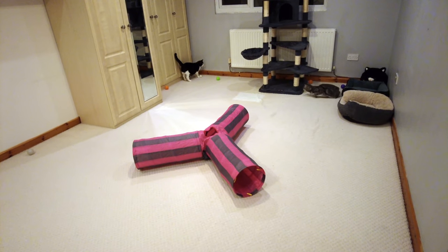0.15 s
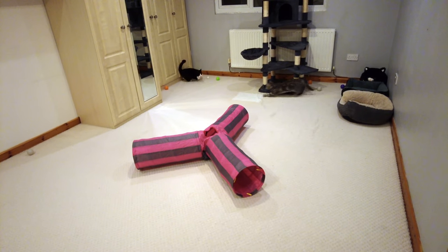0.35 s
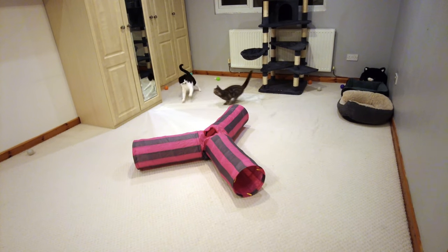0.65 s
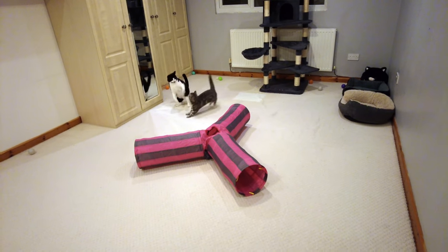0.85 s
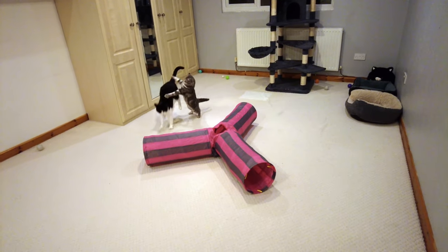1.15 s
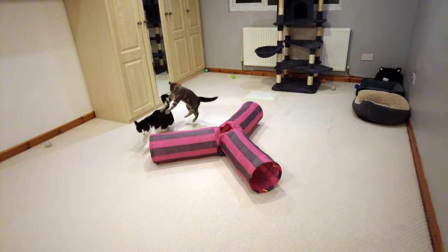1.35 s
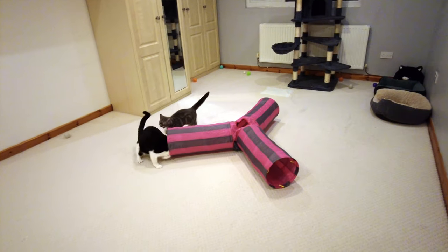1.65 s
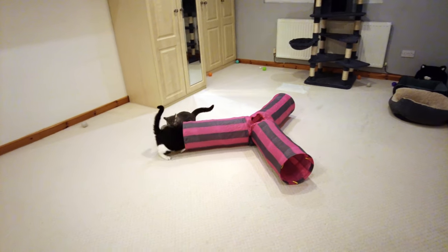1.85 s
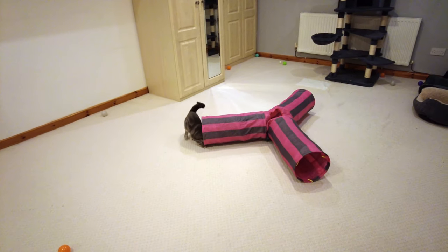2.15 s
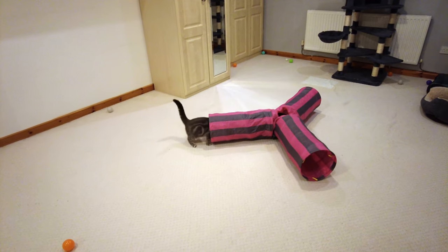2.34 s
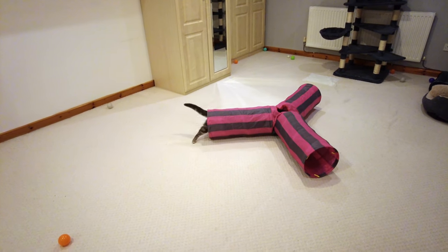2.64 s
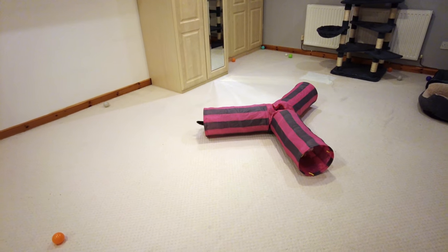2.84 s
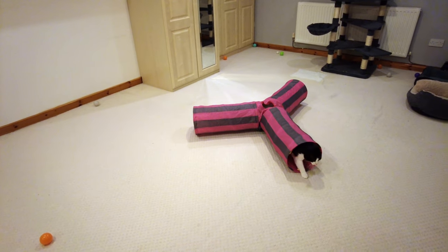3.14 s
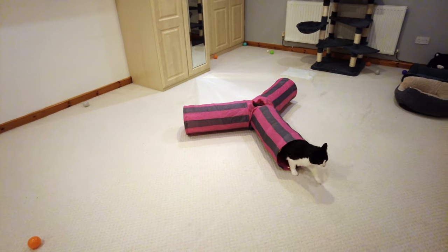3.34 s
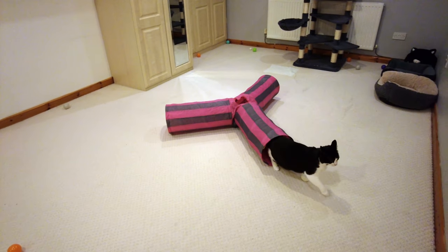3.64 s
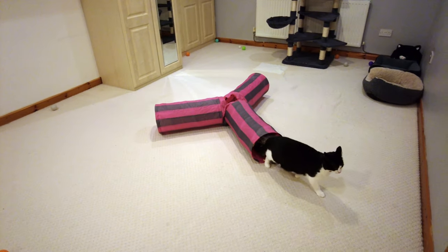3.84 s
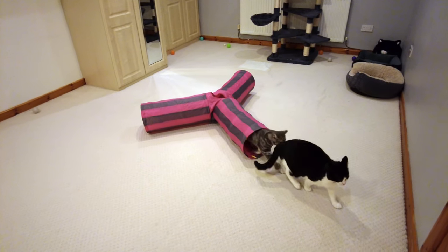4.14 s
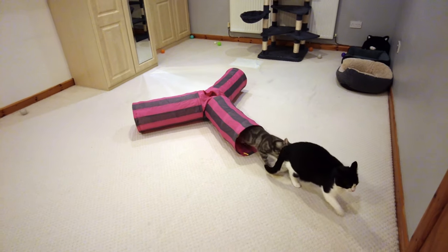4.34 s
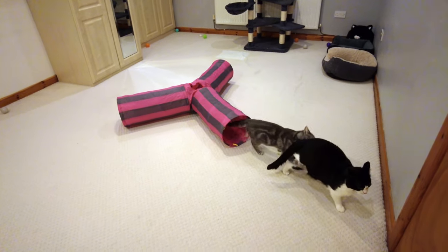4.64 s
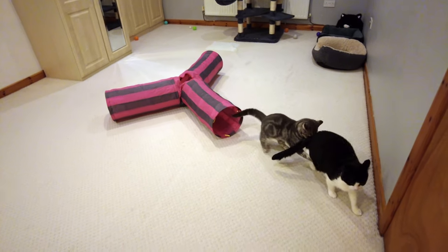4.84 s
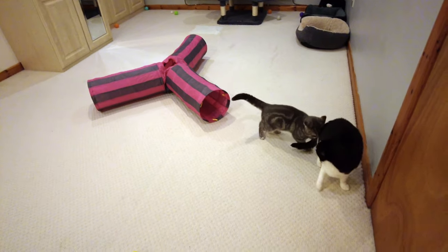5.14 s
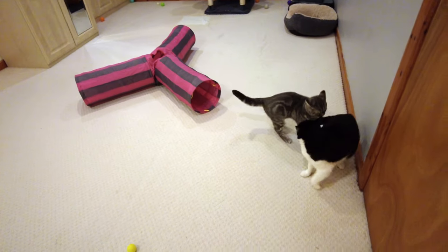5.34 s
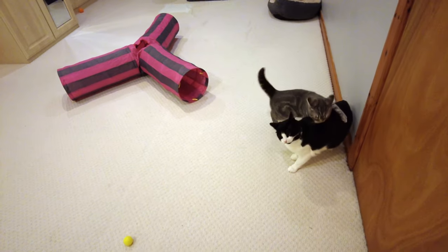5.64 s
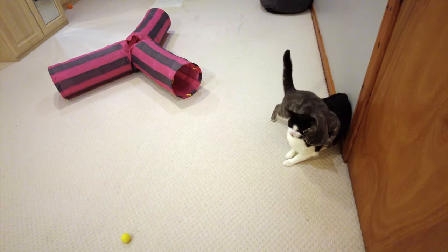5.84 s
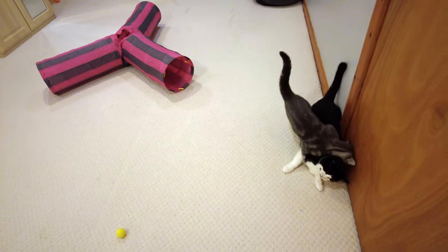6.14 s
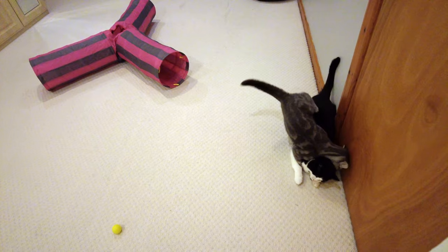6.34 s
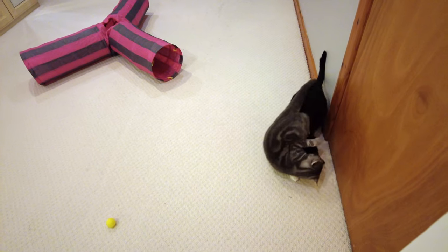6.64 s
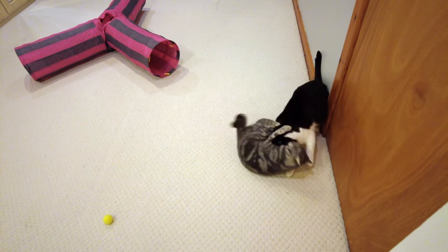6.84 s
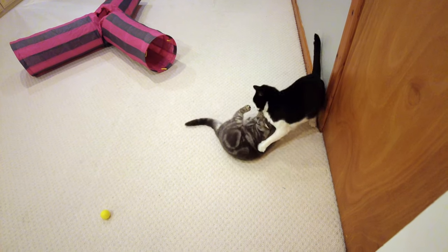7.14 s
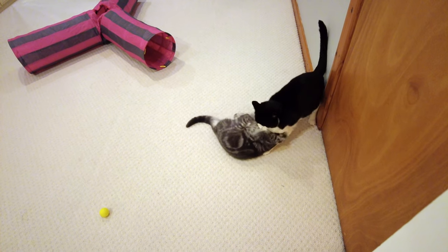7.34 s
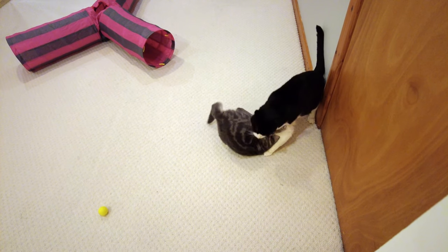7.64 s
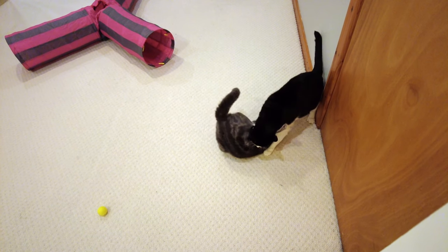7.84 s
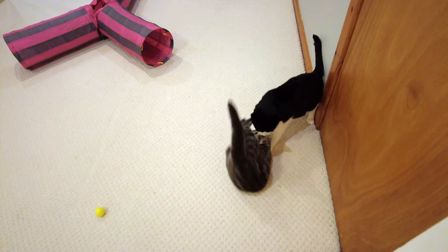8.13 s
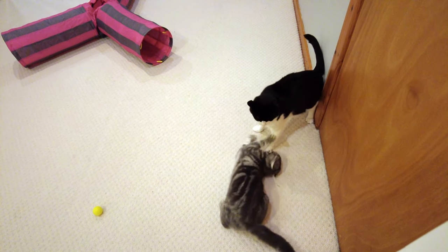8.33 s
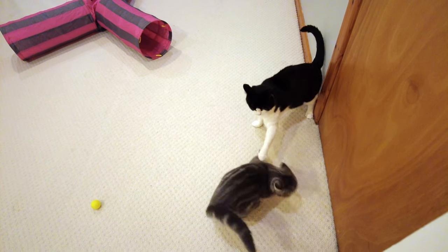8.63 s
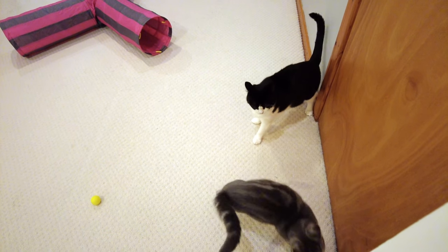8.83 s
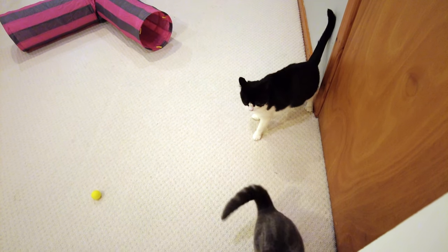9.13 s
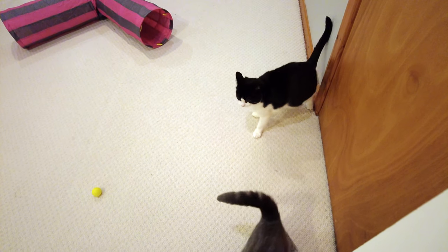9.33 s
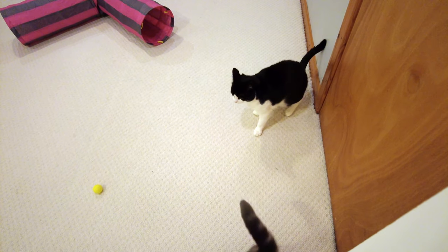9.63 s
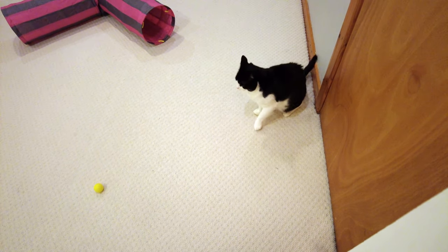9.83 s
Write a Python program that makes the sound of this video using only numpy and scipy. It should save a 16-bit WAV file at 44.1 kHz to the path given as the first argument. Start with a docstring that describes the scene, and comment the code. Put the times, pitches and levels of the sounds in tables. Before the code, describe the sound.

Cats gallop and scuffle over a carpeted floor, crackle through a crinkly fabric tunnel, then one bangs a wooden door and softer thumps follow.

```python
"""Over a quiet room tone, two cats chase across a carpeted bedroom: paws thud on joisted boards, pads scuff
and claws catch, all made from shaped noise and decaying modes, with brief rough squeaks from unsteady tones.
They push through a crinkly fabric play tunnel, heard as clusters of tiny clicks and sharp sprays of noise.
Then they wrestle by a wooden door: coats hiss as dense fine clicks, and one body hits the door, which booms
as beating low modes and clacks once against its latch. Softer tumbles and steps follow close by."""
import sys
import numpy as np
from scipy import signal
from scipy.fft import rfft, irfft, next_fast_len
from scipy.io import wavfile
from scipy.ndimage import uniform_filter1d

SR = 44100
rng = np.random.default_rng(int(sys.argv[2]) if len(sys.argv) > 2 else 0)


def log_audio(samples):
    """Write samples as a 16-bit WAV file to the path given in sys.argv[1]."""
    # one column per channel
    frames = np.atleast_2d(samples).T
    # limit to full scale, then quantise
    limited = np.clip(frames, -1, 1)
    pcm = np.round(limited * 32767).astype(np.int16)
    wavfile.write(sys.argv[1], SR, pcm)


N = 440118

ROOM_T60_S = 0.48  # carpet keeps the echo short
RUB_FADE_DB_PER_S = 150  # a sliding paw or coat comes to a stop


def undb(db):
    """Decibels to gain."""
    return 10 ** (np.asarray(db) / 20)


def unit(x):
    """Scale to rms 1."""
    return x / np.sqrt(np.mean(x ** 2))


def peak(x, db):
    """Scale to a peak level."""
    return x * undb(db) / np.abs(x).max()


def clock(length):
    """Sample times over a length in seconds."""
    return np.arange(int(length * SR)) / SR


def add(track, s, sound):
    """Mix a mono or stereo sound in at time s."""
    start = int(s * SR)
    track[:, start:start + sound.shape[-1]] += sound[..., :max(N - start, 0)]


def swell(rows):
    """Gain along a (time [s], level [dB]) curve, silent outside it."""
    return undb(np.interp(np.arange(N) / SR, *np.transpose(rows), left=-np.inf, right=-np.inf))


def strokes(rows, fade_db_per_s):
    """Gain of a run of gestures: each rises, holds and fades at one shared rate; their powers add."""
    t, power = np.arange(N) / SR, 0
    for s, rise, hold, db in rows:
        fade_db = np.minimum(fade_db_per_s * np.maximum(t - s - rise - hold, 0), 200)
        gain = np.clip((t - s) / rise, 0, 1) * undb(db - fade_db)
        power = power + gain ** 2
    return np.sqrt(power)


def band(x, lo_hz, hi_hz, order=2):
    """Causal band-pass."""
    edges = [lo_hz, min(hi_hz, SR / 2 - 1)]
    return signal.sosfilt(signal.butter(order, edges, "band", fs=SR, output="sos"), x)


def colour(x, points):
    """Shape a sound by (frequency [Hz], level [dB]) points, causally, keeping the power of white noise."""
    hz, db = np.transpose(points)
    size = 8192
    bins = np.maximum(np.fft.rfftfreq(size, 1 / SR), 1)
    cepstrum = irfft(np.log(undb(np.interp(np.log(bins), np.log(hz), db))))
    # folding the cepstrum forward gives minimum phase
    response = irfft(np.exp(rfft(cepstrum * 2 * (np.arange(size) < size // 2))))
    response = response / np.linalg.norm(response)
    return signal.oaconvolve(np.atleast_2d(x), response[None], axes=1)[:, :x.shape[-1]]


def ring(modes, length, scatter_db=0, detune=0):
    """Decaying modes; where the blow lands shifts their strength and pitch."""
    t, out = clock(length), 0
    for hz, db, t60 in modes:
        size, shift = rng.standard_normal(2)
        decay = np.exp(-np.log(1000) * t / t60)
        tone = np.cos(2 * np.pi * hz * (1 + detune * shift) * t)
        out = out + undb(db + scatter_db * size) * decay * tone
    return out


def push(x, contact_s):
    """A soft contact spreads a blow over time and takes its treble away."""
    return signal.fftconvolve(x, np.sin(np.pi * clock(contact_s) / contact_s) ** 2)


def burst(rise_s, t60):
    """Noise that builds quickly and dies away."""
    t = clock(0.5)
    return rng.standard_normal(len(t)) * (1 - np.exp(-t / rise_s)) * np.exp(-np.log(1000) * t / t60)


def grains(per_s, spread_db):
    """Random tiny clicks of widely differing size."""
    hits = rng.random(N) < per_s / SR
    return hits * rng.standard_normal(N) * undb(spread_db * np.minimum(rng.exponential(size=N), 4))


def walk(rate):
    """Slow chance: random levels, smoothly joined, rate of them a second."""
    k = int(SR / rate)
    return unit(uniform_filter1d(np.repeat(rng.standard_normal(N // k + 1), k), k)[:N])


def pair(likeness, a, b):
    """Left and right from two unrelated sounds."""
    c = np.clip(likeness, 0, 1)
    return (np.sqrt(1 + c) * a + np.sqrt(1 - c) * b * np.array([[1], [-1]])) / np.sqrt(2)


def in_room(x, wet_db, likeness, t60=ROOM_T60_S, delay_s=0.001):
    """A broadband sound plus its diffuse echo: noise that holds the energy the walls have not yet soaked up."""
    keep, build = np.exp(-2 * np.log(1000) / (t60 * SR)), np.exp(-1 / (delay_s * SR))
    arriving = signal.lfilter([1 - build], [1, -build], x ** 2 + 1e-18)
    energy = signal.lfilter([1 - keep], [1, -keep], arriving)
    echo = np.sqrt(energy) * pair(likeness, *rng.standard_normal((2, len(x))))
    return (x + undb(wet_db) * echo) / np.hypot(1, undb(wet_db))


def near_walls(x, db=-18, count=7):
    """The closest wall, door and furniture send back a few quick reflections, other ones to each side."""
    out = x.copy()
    side_lags = (rng.uniform(0.001, 0.012, (2, count)) * SR).astype(int)
    for channel, lags in enumerate(side_lags):
        for lag in lags:
            out[channel, lag:] += undb(db) * x[channel, :-lag]
    return out / np.sqrt(1 + count * undb(db) ** 2)


def room_tone():
    """A faint rumble, the same on both sides, under diffuse hiss and a thin whine."""
    # spectrum of the room tone, relative: (frequency [Hz], level [dB])
    tone_curve = [(15, -24.5), (25, 2), (64, 1), (108, -17), (166, -11), (229, -27.5), (326, -16.5),
                  (818, -36), (1480, -35.5), (1740, -34.5), (2050, -36.5), (5880, -41.5), (12200, -51.5),
                  (13600, -61), (16000, -82)]
    # faint steady whine: (frequency [Hz], level [dB])
    whine_lines = [(1766, -79.5), (2336, -76.5)]
    tone_db = -44.5
    mid, side = colour(rng.standard_normal((2, N)), tone_curve)
    side = signal.sosfilt(signal.butter(1, 450, "high", fs=SR, output="sos"), side)
    whine = sum(undb(db) * unit(band(rng.standard_normal(N), hz - 12, hz + 12)) for hz, db in whine_lines)
    return undb(tone_db) * (mid + undb(-1.0) * side * np.array([[1], [-1]])) + whine


def scuffs(spread_db=1.0, patchy_db=2):
    """Loops of carpet catch and let go under sliding paws."""
    # fur and pads drag over the carpet: (time [s], rise [s], hold [s], level [dB])
    drags = [(0.21, 0.024, 0.01, -43.5), (0.26, 0.0046, 0.008, -41.5), (0.29, 0.056, 0.069, -34),
             (0.39, 0.012, 0.084, -31), (0.535, 0.02, 0.1, -38), (0.75, 0.0099, 0.021, -37.5),
             (0.875, 0.0085, 0.03, -38), (1.03, 0.015, 0.042, -45), (1.209, 0.004, 0.028, -40),
             (1.31, 0.025, 0.02, -39.5), (1.44, 0.0092, 0.12, -39.5), (1.62, 0.027, 0.026, -32),
             (1.93, 0.015, 0.012, -37), (5.995, 0.015, 0.023, -52.5), (6.07, 0.11, 0.03, -48),
             (6.658, 0.012, 0.008, -46.5), (6.7, 0.054, 0.034, -43.5), (6.852, 0.019, 0.0093, -41),
             (7.05, 0.012, 0.012, -52.5), (8.272, 0.03, 0.022, -34), (8.455, 0.0094, 0.044, -49)]
    # colour of the carpet pile: (frequency [Hz], level [dB])
    pile = [(150, 9.5), (400, 15.5), (800, 5.5), (1700, -2.5), (2600, -10.5), (4500, -17.5), (9000, -28),
            (16000, -28.5)]
    loops = grains(per_s=7000, spread_db=spread_db)
    rub = unit(loops * undb(patchy_db * walk(110))) * strokes(drags, RUB_FADE_DB_PER_S)
    return colour(in_room(rub, wet_db=4.0, likeness=0.15, t60=0.12), pile)


def footfall(thud_db, weight_db, slap_db):
    """One paw bends the boards, thuds through the underlay and slaps the pile; the room hums briefly."""
    # floor boards on their joists: (frequency [Hz], level [dB], t60 [s])
    board_modes = [(26.83, 2, 0.93), (34.6, -11, 0.97), (48.5, -8.5, 0.77), (55.46, 1, 0.79),
                   (66.6, -2, 0.55), (81.4, -5, 0.3), (106, -20, 0.25)]
    # low room resonances that every thud wakes: (frequency [Hz], level [dB], t60 [s])
    room_modes = [(122.5, -7.5, 0.53), (152.1, -0.5, 0.61), (192.7, 1, 0.44), (234, -5.5, 0.19),
                  (296, -2.5, 0.36), (329.5, 2, 0.38), (391, -5, 0.29), (445, -8, 0.49)]
    hum_db = -6  # against the thud
    thud = in_room(burst(rise_s=0.0028, t60=0.11), wet_db=0.5, likeness=0.89)
    slap = in_room(burst(rise_s=0.0035, t60=0.069), wet_db=1.5, likeness=0.031, t60=0.2)
    boards = ring(board_modes, 0.5, scatter_db=12.0, detune=0.069)
    boards = push(boards, contact_s=0.01)[:thud.shape[1]]
    hum = ring(room_modes, 0.5, scatter_db=4.5, detune=0.0299)
    hum = hum * (1 - np.exp(-clock(0.5) / 0.0071))  # the room takes 7 ms to answer
    thud = band(thud, lo_hz=89.7, hi_hz=237.0, order=3)
    slap = band(slap, lo_hz=253, hi_hz=630, order=4)
    return (peak(boards, weight_db) + peak(thud, thud_db)
            + peak(hum, thud_db + hum_db) + peak(slap, slap_db))


def paws():
    """Each landing is a pair of footfalls; light, uneven steps go on throughout."""
    # a cat lands on its leading paw: (time [s], thud of the pads [dB],
    # weight on the boards [dB], slap on the pile [dB])
    landings = [(0.259, -22.5, -29, -34), (0.306, -21, -25, -26.5), (0.434, -25, -18.5, -35),
                (0.543, -24, -16, -48), (0.642, -26.5, -10.5, -51), (0.762, -19, -14.5, -39),
                (0.884, -18.5, -13, -33), (1.032, -29, -19, -46), (1.111, -35, -19.5, -46),
                (1.209, -26, -47, -46), (1.25, -28, -19, -51), (1.357, -23.5, -19, -47),
                (1.457, -17.5, -21, -42), (1.54, -18.5, -20, -46), (1.588, -18.5, -18, -36),
                (1.647, -25.5, -23, -44), (1.719, -23.5, -20.5, -41), (1.789, -23.5, -25, -48),
                (1.866, -22, -18, -30), (1.998, -31, -21.5, -37), (2.134, -21, -25, -30),
                (2.201, -24, -22, -27), (2.348, -47, -30, -18.5), (2.679, -25, -22, -51),
                (2.93, -29.5, -28, -43), (3.199, -32, -27.5, -28), (3.489, -23.5, -24, -30),
                (4.927, -31, -31.5, -51), (5.025, -27.5, -25.5, -33), (5.251, -34.5, -31, -42),
                (5.42, -28.5, -24.5, -48), (5.789, -33, -27.5, -47), (5.995, -35.5, -39, -59),
                (6.076, -27.5, -25.5, -38), (6.751, -29, -37, -40), (6.884, -32.5, -48, -36),
                (7.24, -39, -33, -51), (7.774, -30, -28, -40), (8.282, -25, -40, -29.5),
                (8.309, -22, -27, -16), (8.387, -26, -24, -37), (8.475, -37.5, -38, -37),
                (8.84, -27.5, -43, -29), (8.976, -31, -26.5, -37.5), (9.079, -26, -34, -27.5),
                (9.264, -29.5, -50, -30), (9.702, -43, -35, -57), (9.764, -44, -50, -44),
                (9.949, -50, -52, -47)]
    # the other paw follows, sooner at a run than at a walk, and lands more softly
    run_gap_s, walk_gap_s, run_ends_s = 0.04, 0.068, 2.5
    second_thud_db, second_weight_db, second_slap_db = -10, -6.5, -16
    steps_per_s = 3.5
    out = np.zeros((2, N))
    for s, thud_db, weight_db, slap_db in landings:
        gap = run_gap_s if s < run_ends_s else walk_gap_s
        add(out, s, footfall(thud_db, weight_db, slap_db))
        second = footfall(thud_db + second_thud_db, weight_db + second_weight_db, slap_db + second_slap_db)
        add(out, s + gap, second)
    count = int(steps_per_s * N / SR)
    step_times = (np.arange(1, count) + rng.random(count - 1) / 2) * N / SR / count
    for s in step_times:
        add(out, s, footfall(thud_db=-44, weight_db=-46, slap_db=-61))
    return out


def claws(spread_db=2):
    """Each scrape is a quick run of tiny catches that weakens as the claw comes free."""
    # a claw rips through carpet loops or scrapes on wood:
    # (time [s], length [s], centre [Hz], level [dB])
    scrapes = [(0.405, 0.015, 1450, -30), (0.445, 0.053, 800, -30.5), (0.467, 0.008, 2790, -41),
               (0.486, 0.0098, 2470, -25), (0.644, 0.0051, 8000, -44.5), (1.448, 0.035, 3900, -52),
               (1.653, 0.021, 800, -40), (6.862, 0.035, 1140, -47), (6.884, 0.042, 2300, -53),
               (6.935, 0.004, 8000, -43.5), (9.055, 0.03, 4100, -60), (9.5748, 0.0053, 2380, -46.5),
               (9.58, 0.0036, 8500, -54), (9.586, 0.026, 1900, -60), (9.592, 0.017, 4700, -57)]
    out = np.zeros((2, N))
    t = clock(0.5)
    catches = unit(grains(per_s=9000, spread_db=spread_db))
    for k, (s, length, hz, db) in enumerate(scrapes):
        run = catches[k * len(t):(k + 1) * len(t)] * np.exp(-(t / length) ** 2)
        run = in_room(run, wet_db=2, likeness=0.15, t60=0.3)
        run = band(run, hz / np.sqrt(2), hz * np.sqrt(2))
        # make up for the power lost in a narrow band
        add(out, s, undb(db) * run * np.sqrt(SR / hz / np.sqrt(2)))
    return out


def squeaks(overtone_db=-19, rasp_db=-15):
    """Brief rough squeaks: an unsteady tone, its octave and a rasp; a blur of the pitch stays in the room."""
    # short squeaks in the scuffle: (time [s], length [s], pitch [Hz], level [dB])
    squeak_rows = [(1.104, 0.04, 917, -38.5), (1.945, 0.026, 791, -23.5), (1.968, 0.018, 774, -31.5),
                   (1.988, 0.016, 730, -30)]
    out = np.zeros((2, N))
    for s, length, hz, db in squeak_rows:
        u = clock(length) / length
        pitch = hz * (1 + 0.063 * walk(453)[:len(u)])
        phase = 2 * np.pi * np.cumsum(pitch) / SR
        rasp = unit(band(rng.standard_normal(len(u)), lo_hz=900, hi_hz=2740))
        tone = np.sin(phase) + undb(overtone_db) * np.sin(2 * phase) + undb(rasp_db) * rasp
        blur = in_room(burst(rise_s=0.0037, t60=0.035), wet_db=12.0, likeness=0.15)
        add(out, s, peak(np.sin(np.pi * u) ** 2 * tone, db))
        add(out, s, peak(band(blur, lo_hz=hz * 0.76, hi_hz=hz * 1.14), db - 1))
    return out


def tunnel(crinkle_db=1, cloth_db=-0.5, crease_db=-9.5):
    """The stiff lining buckles in click clusters, single creases pop, and the cloth flaps and drags below."""
    # a cat shoves against the tunnel wall: (time [s], rise [s], hold [s], level [dB])
    shoves = [(1.68, 0.045, 0.0036, -31), (2.14, 0.085, 0.07, -31), (2.3, 0.022, 0.025, -23.5),
              (2.41, 0.0078, 0.03, -28), (2.545, 0.01, 0.031, -29), (2.58, 0.041, 0.067, -35),
              (2.98, 0.021, 0.026, -38.5), (3.09, 0.021, 0.029, -33), (3.193, 0.0038, 0.011, -25),
              (3.325, 0.0026, 0.0088, -32.5), (3.415, 0.021, 0.053, -31), (3.52, 0.015, 0.039, -34),
              (3.812, 0.0052, 0.0087, -33), (3.88, 0.022, 0.024, -36.5), (4.085, 0.027, 0.13, -31.5),
              (4.335, 0.006, 0.011, -39), (4.615, 0.034, 0.052, -36), (4.73, 0.049, 0.034, -38.5),
              (5.195, 0.0033, 0.0047, -50)]
    # steady brushing while the cats are inside: (time [s], level [dB])
    brushing = [(1.8, -61), (2.1, -37), (2.9, -40.5), (3.6, -39.5), (3.76, -43), (4.05, -43), (4.55, -46.5),
                (4.95, -47), (5.35, -70)]
    # colour of the stiff lining: (frequency [Hz], level [dB])
    crinkle_curve = [(530, -1.5), (900, -23.5), (1150, -13.5), (1270, 2), (1530, -3.5), (1880, -3.5),
                     (2330, -7), (2570, -3.5), (3820, -7.5), (4570, -5.5), (10000, -13), (15100, -16),
                     (16000, -19)]
    # colour of the soft cloth: (frequency [Hz], level [dB])
    cloth_curve = [(30, 1), (55, 17.5), (110, 6), (220, 7), (370, 5.5), (520, -6), (750, 1), (1000, -3),
                   (1500, -8), (4000, -65)]
    # the fabric comes to rest after each shove
    motion = np.hypot(strokes(shoves, fade_db_per_s=172), swell(brushing))
    clusters = undb(2.2 * walk(130))
    crinkle = unit(grains(per_s=2000, spread_db=2.0) * clusters) * motion
    cloth = unit(grains(per_s=1300, spread_db=0.5) * clusters) * motion
    creases = unit(grains(per_s=70, spread_db=2)) * motion
    crinkle = colour(in_room(crinkle, wet_db=6, likeness=0.35, t60=0.31), crinkle_curve)
    for hz in (790, 1400, 2800, 5530):  # large and small folds take turns, so the colour keeps shifting
        folds = band(crinkle, hz / np.sqrt(2), hz * np.sqrt(2), order=1)
        crinkle = crinkle + folds * (undb(1.6 * walk(30) + 1.3 * walk(7)) - 1)
    creases = in_room(creases, wet_db=0, likeness=0.2, t60=0.027)
    creases = band(creases, lo_hz=1300, hi_hz=8000, order=1)
    cloth = colour(in_room(cloth, wet_db=0.5, likeness=0.67, t60=0.8), cloth_curve)
    return undb(crinkle_db) * crinkle + undb(crease_db) * creases + undb(cloth_db) * cloth


def snaps():
    """A stiff fold of the tunnel lets go in a brief spray of noise."""
    # stiff folds of the tunnel snap through: (time [s], crack [dB], fine tick [dB])
    snap_rows = [(1.7442, -25, -23.5), (2.3126, -21, -21), (2.346, -19, -22), (3.1994, -26, -16.5),
                 (3.312, -26.5, -28), (3.4451, -28, -22), (3.827, -23, -26), (3.899, -24.5, -27),
                 (4.345, -30, -21), (4.455, -31, -29), (4.5820, -36, -25.5), (4.7348, -31, -25),
                 (4.9055, -44, -33), (4.9294, -40, -32), (5.02, -50, -33), (5.2011, -56, -32)]
    out = np.zeros((2, N))
    for s, crack_db, tick_db in snap_rows:
        spray = burst(rise_s=0.0009, t60=0.012)
        spray = spray * undb(2.8 * rng.standard_normal(len(spray)))
        spray = in_room(spray, wet_db=-2.0, likeness=0.16, t60=0.13)
        add(out, s, peak(band(spray, lo_hz=1220, hi_hz=3460), crack_db))
        add(out, s, peak(band(spray, lo_hz=4740, hi_hz=13700), tick_db))
    return out


def fur(spread_db=2):
    """Hairs slip past each other in a fine, dry hiss."""
    # coats rub on each other and the door: (time [s], rise [s], hold [s], level [dB])
    rubs = [(6.07, 0.01, 0.053, -58.5), (6.168, 0.022, 0.01, -43.5), (6.47, 0.026, 0.061, -61.5),
            (6.76, 0.025, 0.22, -60.5), (8.277, 0.0054, 0.028, -54.5), (8.35, 0.02, 0.05, -57),
            (8.46, 0.03, 0.2, -62.5), (8.99, 0.023, 0.079, -58.5)]
    # colour of the coat: (frequency [Hz], level [dB])
    coat = [(700, -7), (1700, 6), (5500, -1), (9000, -7.5), (16000, -16)]
    rub = unit(grains(per_s=3000, spread_db=spread_db)) * strokes(rubs, RUB_FADE_DB_PER_S)
    return colour(in_room(rub, wet_db=-2.5, likeness=0.27, t60=0.22), coat)


def door_boom(build_s=0.0038, rumble_db=-17):
    """A soft body shoves the leaf; its low modes swell under the weight and the room rumbles unevenly."""
    # the door leaf, its modes in close pairs that beat: (frequency [Hz], level [dB], t60 [s])
    leaf = [(32.37, -6.5, 1.22), (40.7, -16, 0.7), (52.4, -8, 0.47), (75.4, 3.5, 0.3), (85.8, -7.5, 0.35),
            (102.7, -15.5, 0.71), (144, -17, 0.53), (154, -11.5, 0.52), (294, -21, 0.52), (334, -16, 0.61)]
    door_s = 6.172  # a cat's flank meets the door
    out = np.zeros((2, N))
    swing = ring(leaf, 1) * (1 - np.exp(-clock(1) / build_s))
    rumble = in_room(burst(rise_s=0.02, t60=0.28), wet_db=7, likeness=0.93, t60=0.48)
    add(out, door_s, -peak(push(swing, contact_s=0.005), -2.6))  # the leaf moves away
    add(out, door_s, peak(band(rumble, lo_hz=70, hi_hz=185, order=3), rumble_db))
    return out


def door_latch(lag_s=0.00007, build_s=0.00054):
    """The latch hits the frame: a hard wooden crack with a short metal ring, heard first on the right."""
    # the latch strikes once; a weaker reflection of the crack follows: (time [s], level [dB])
    arrivals = [(6.1899, -6.5), (6.2132, -20)]
    # latch and frame: (frequency [Hz], level [dB], t60 [s])
    latch_modes = [(1168, -17, 0.27), (1405, -7.5, 0.057), (1385, -20, 0.37), (1540, -26, 0.28),
                   (1940, -25, 0.35), (1950, -19, 0.28), (2519, -27, .21), (2800, -22, .21),
                   (2910, 3.5, 0.022), (3010, -26, 0.44), (4980, -11, 0.02), (5740, 3, 0.013),
                   (6610, -1, 0.013)]
    # the dense ring of the wooden frame: (frequency [Hz], level [dB])
    frame = [(150, -5), (330, -1.5), (500, -1.5), (750, -3.5), (1050, -8.5), (1300, 0.5), (1650, -2.5),
             (1960, -1.5), (2280, -10), (2600, -5.5), (3020, -6), (3350, -16.5), (4400, -15), (6200, -25),
             (7500, -26), (11000, -27.5), (16000, -42)]
    ring_db, bolt_db = 1, 0  # peaks of the metal ring and the bolt's click, relative to each arrival's level
    out = np.zeros((2, N))
    for s, db in arrivals:
        crack = in_room(burst(rise_s=0.00048, t60=0.025), wet_db=8, likeness=0.32, t60=0.39)
        bolt = band(burst(rise_s=0.00013, t60=0.012), lo_hz=1290, hi_hz=6500, order=3)
        metal = ring(latch_modes, 0.5) * (1 - np.exp(-clock(0.5) / build_s))
        add(out, s, peak(push(metal, contact_s=0.00013), db + ring_db))
        add(out, s, peak(bolt, db + bolt_db))
        add(out, s, undb(db) * colour(crack, frame))
    late_left = np.interp(np.arange(N) - lag_s * SR, np.arange(N), out[0])
    return np.array([late_left, out[1]])


def scene():
    """All the sources in one small room."""
    rustle = near_walls(tunnel() + scuffs() + fur() + claws(), db=-15) + near_walls(snaps(), db=-10.5)
    door = door_boom() + near_walls(door_latch(), db=-20.5)
    return paws() + squeaks() + rustle + door + room_tone()


def record(dry):
    """Each microphone port colours its side; peaks clip at full scale, then the top is cut."""
    # colour difference of the two ports: (frequency [Hz], left minus right [dB])
    ports = [(30, -3.5), (70, 0.7), (250, 0.4), (520, 2.5), (1900, 0.2), (12000, -0.5)]
    top_hz = 16000
    hz, db = np.transpose(ports)
    size = next_fast_len(N + SR)
    tilt = np.interp(np.log(np.fft.rfftfreq(size, 1 / SR) + 1), np.log(hz), db)
    heard = irfft(rfft(dry, size) * undb(np.array([tilt, -tilt]) / 2), size)[:, :N]
    top_cut = signal.ellip(10, 0.2, 80, top_hz, fs=SR, output="sos")
    return signal.sosfilt(top_cut, np.clip(heard, -1, 1))


dry = scene()
out = record(dry)
log_audio(out)
```